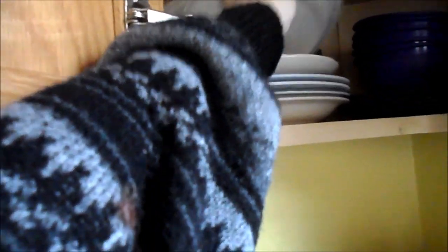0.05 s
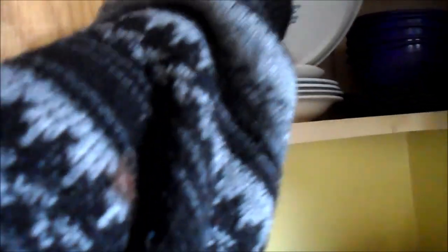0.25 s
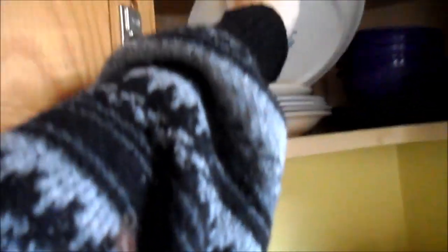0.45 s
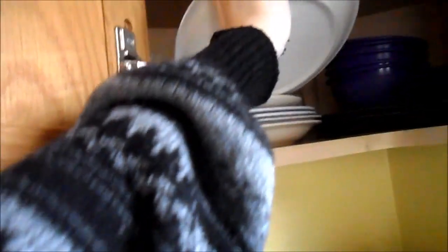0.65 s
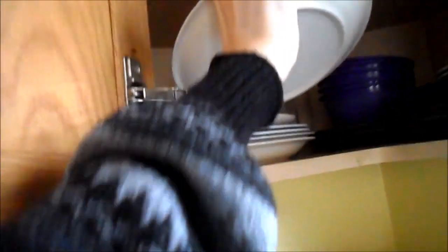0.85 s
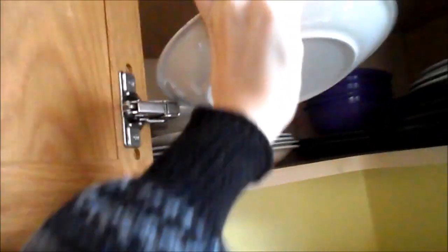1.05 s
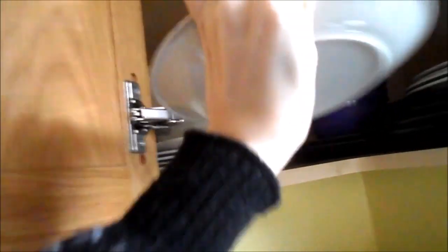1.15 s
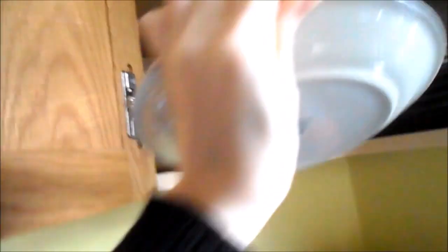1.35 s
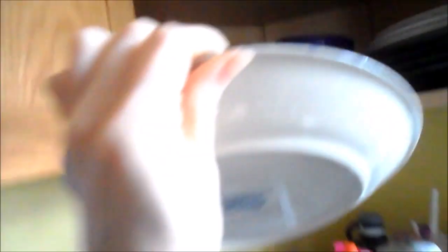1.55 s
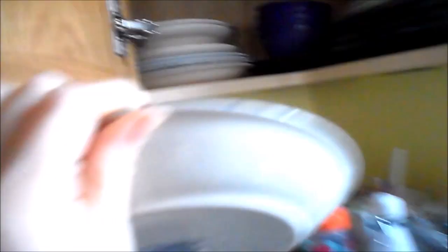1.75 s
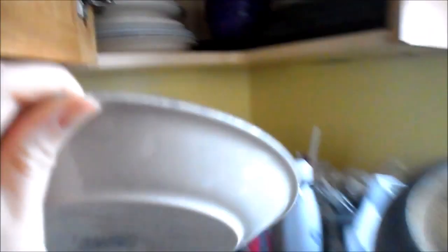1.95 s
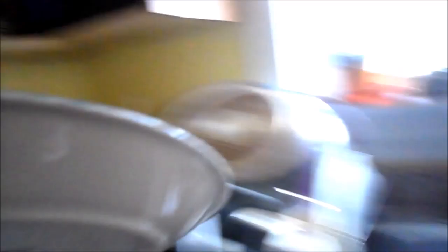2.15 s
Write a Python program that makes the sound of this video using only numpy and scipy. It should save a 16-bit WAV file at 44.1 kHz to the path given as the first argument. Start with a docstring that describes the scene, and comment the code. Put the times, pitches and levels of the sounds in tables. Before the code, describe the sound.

Ceramic plates clatter and ring as one is tipped up from a stack. It bumps and scrapes over the others, then knocks the wooden cupboard edge. A phone microphone at arm's length picks up faint kitchen hum.

```python
"""Ceramic plates in a wooden kitchen cupboard, a phone microphone at arm's length, over the room's hum.
The stack clatters as one plate is tipped up; each blow is a burst of chattering contacts that rings
the plates and echoes in the cupboard. The plate bumps and slides over the others, then knocks the
cupboard edge on its way out, which stills it. Last, a sleeve swishes softly three times."""
import sys
import numpy as np
from scipy import signal
from scipy.fft import rfft, irfft
from scipy.io import wavfile
from scipy.ndimage import uniform_filter1d

SR = 44100
rng = np.random.default_rng(int(sys.argv[2]) if len(sys.argv) > 2 else 0)


def dump_mix(stems):
    """Bounce the given channels to the path in sys.argv[1] as a 16-bit WAV at rate SR."""
    frames = np.atleast_2d(stems).T  # one column per channel
    limited = np.clip(frames, -1, 1)  # hard clip at full scale
    pcm = np.round(limited * 32767).astype(np.int16)
    wavfile.write(sys.argv[1], SR, pcm)


N = 97020
T = np.arange(N) / SR
BIN_HZ = np.arange(N // 2 + 1) * SR / N


def undb(db):
    return 10 ** (np.asarray(db) / 20)


def unit_rms(x):
    return x / np.sqrt(np.mean(x ** 2))


def excite(x, response):
    """Pass x through an impulse response scaled to unit energy."""
    return signal.fftconvolve(x, response / np.sqrt(np.sum(response ** 2)))[:N]


def on_log(table, hz):
    """Read rows of frequency_hz, value on a log frequency axis."""
    table = np.array(table)
    return np.interp(np.log(np.maximum(hz, 1)), np.log(table[:, 0]), table[:, 1])


def colour(x, spectrum):
    """Minimum-phase filter shaped by rows of frequency_hz, gain_db, scaled to a mean power gain of 1."""
    size = 4096
    gain = unit_rms(undb(on_log(spectrum, np.arange(size // 2 + 1) * SR / size)))
    cepstrum = irfft(np.log(gain))
    cepstrum[1:size // 2] *= 2
    cepstrum[size // 2 + 1:] = 0
    return signal.fftconvolve(x, irfft(np.exp(rfft(cepstrum))))[:N]


def wander(rate_hz):
    """Smooth random drift of unit RMS."""
    width = int(SR / rate_hz)
    return unit_rms(uniform_filter1d(uniform_filter1d(rng.standard_normal(N), width), width))


def room_hum(level_db=-55.5, flicker_db=2):
    """Room rumble and microphone hiss; each octave flickers on its own."""
    # noise floor: frequency_hz, gain_db
    floor = [(12, -19.5), (20, 1), (60, 2), (101, -12), (399, -15.5), (1810, -36), (1960, -27),
             (2140, -34.5), (2320, -34), (16000, -41)]
    spectrum = rfft(rng.standard_normal(N)) * undb(on_log(floor, BIN_HZ))
    out = 0
    for low_hz in 15 * 2 ** np.arange(11.):
        octave = irfft(spectrum * ((BIN_HZ >= low_hz) & (BIN_HZ < 2 * low_hz)), N)
        out += octave * undb(flicker_db * wander(rate_hz=6.6))
    return unit_rms(out) * undb(level_db)


def sleeve_swishes():
    """Soft swells of hiss as the cloth of a sleeve moves."""
    # sleeve movements: middle_s, half_width_s, level_db, centre_hz
    swishes = [(1.5, 0.057, -58.5, 4710), (1.79, 0.073, -59.5, 4740), (2.18, 0.067, -60.5, 5000)]
    # hiss of a swish centred on 4800 Hz: frequency_hz, gain_db
    cloth_spectrum = [(880, -24), (1500, -8), (2280, -11), (2790, -2.5), (3740, -3.5), (5380, -1),
                      (7160, -11), (10000, -18.5), (13000, -44), (22000, -120)]
    out = 0
    for middle_s, half_width_s, level_db, centre_hz in swishes:
        shifted = [(hz * centre_hz / 4800, db) for hz, db in cloth_spectrum]
        shifted = [(shifted[0][0] / 2, -50)] + shifted + [(1.5 * shifted[-1][0], -50)]
        hiss = colour(rng.standard_normal(N), shifted)
        swell = np.exp(-.5 * ((T - middle_s) / half_width_s * 0.97) ** 2)
        out += hiss * undb(level_db + wander(rate_hz=25)) * swell
    return out


def cupboard_echoes(direct, level_db=-13, build_s=0.005):
    """Dense reflections from cupboard and kitchen, each octave dying at its own rate."""
    # reverberation times: frequency_hz, t60_s
    decay_times = [(150, 0.13), (600, 0.33), (2000, 0.37), (6000, 0.14), (12000, 0.37)]
    t, tail = T[:SR // 2], 0
    for low_hz in 125 * 2 ** np.arange(7.):
        octave = signal.butter(2, [low_hz, 2 * low_hz], "band", fs=SR, output="sos")
        band = signal.sosfilt(octave, rng.standard_normal(len(t)))
        t60_s = on_log(decay_times, np.sqrt(2) * low_hz)
        tail += band * undb(-60 * t / t60_s) * (1 - np.exp(-t / build_s))
    return undb(level_db) * excite(direct, tail)


def chatter(scatter_db=4):
    """Dense, uneven contacts of glaze on glaze."""
    return unit_rms(rng.standard_normal(N) * undb(scatter_db * np.clip(rng.standard_normal(N), -2, 2)))


def blow_forces(blows):
    """Hard first contacts, then dying chatter. Two forces: one for the clatter, one for the ring."""
    strike_db = [6.5, 17.5]  # clatter, ring: the ring gets a cleaner strike
    spread_oct = np.array([[0.97], [0.38]])  # and a narrower push around the blow's pitch
    bass_hz, treble_hz = 482.7, 5555
    bass_lift_db, treble_lift_db, mid_floor_db, trim_db = 8.5, 10, -14.5, -10
    hz = BIN_HZ + 1
    bass = 1 / (1 + (hz / bass_hz) ** 4)
    treble = 1 / (1 + (treble_hz / hz) ** 4)
    mid = 1 - bass - treble
    contacts, spectra = chatter(), 0
    for start_s, level_db, pitch_hz, bass_db, treble_db, t60_s, ring_db in blows:
        decay = (T >= start_s) * undb(-60 * np.maximum(T - start_s, 0) / t60_s)
        bursts = np.tile(contacts * decay, (2, 1))
        bursts[:, int(start_s * SR)] = undb(strike_db)
        peak = undb(mid_floor_db) + np.exp(-.5 * (np.log2(hz / pitch_hz) / spread_oct) ** 2)
        tone = bass * undb(bass_db + bass_lift_db) + mid * peak
        tone += treble * undb(treble_db + treble_lift_db)
        spectra += rfft(bursts) * tone * undb(level_db + trim_db) * undb([[0], [ring_db]])
    return irfft(spectra, N)


def clatter(force, level_db=-2, t60_s=0.037, split_hz=1800):
    """Countless small, quickly damped treble modes: a noisy smear over the dull body of the blow."""
    # joint response of the small modes: frequency_hz, gain_db
    spectrum = [(47, -43.5), (80, -9), (200, -5.5), (441, -4), (672, -11), (958, -3.5), (1070, -9),
                (1740, -7), (2220, -13.5), (3240, -5.5), (5050, -12.5), (9000, -27), (16000, -38.5)]
    t = T[:SR // 10]
    smeared = excite(force, rng.standard_normal(len(t)) * undb(-60 * t / t60_s))
    low, high = (signal.butter(2, split_hz, kind, fs=SR, output="sos") for kind in ("low", "high"))
    return undb(level_db) * colour(signal.sosfilt(low, force) + signal.sosfilt(high, smeared), spectrum)


def ring(force, modes):
    """The force sets each mode ringing as a decaying sine."""
    t = T[:SR]
    response = sum(undb(db - 60 * t / t60_s) * np.sin(2 * np.pi * hz * t) for hz, db, t60_s in modes)
    return excite(force, response)


def plates(slide_ring_db=2.5, stilled_t60_s=0.037):
    """Blows and sliding ring whatever is touched; the knock on the cupboard edge stills the plate."""
    # blows within the stack, of the lifted plate and on the cupboard edge, levels relative:
    # start_s, level_db, pitch_hz, bass_db, treble_db, chatter_t60_s, ring_db
    stack_blows = [(0.112, -35.5, 1298, -15, -11, 0.33, -3), (0.168, -27, 1312, -10, -20.5, 0.066, -1),
                   (0.201, -14.5, 799, -11, -29, 0.17, 1.5), (0.208, -13, 854, -10.5, -24, 0.14, -1.5),
                   (0.209, -22.5, 3250, -20, -20, 0.09, 4), (0.237, -6.5, 5200, -11.5, -5.5, 0.07, 4.5),
                   (0.239, -4.5, 1769, -14, -11.5, 0.077, 1), (0.245, -9, 1687, -27, -14, 0.15, -2),
                   (0.255, -11.5, 3100, -20.5, -21.5, 0.12, 5), (0.265, -10.5, 898, -23.5, -26, 0.15, 0),
                   (0.293, -1.5, 1400, -28.5, -7.5, 0.13, -0.5),
                   (0.299, -4.5, 3814, -27.5, -15, 0.062, -4.5), (0.304, -11, 968, -31, -19, 0.097, 0.5),
                   (0.311, -5, 3290, -16.5, -18, 0.15, -3), (0.335, -2.5, 962.6, -19.5, -10, 0.07, 1),
                   (0.346, 1, 1382, -18, -9, 0.091, 1), (0.353, -8, 3764, -18.5, -24.5, 0.017, 1),
                   (0.361, -11.5, 1690, -20.5, -17.5, 0.1, 4), (0.389, -16, 1204, -30, -13, 0.3, 1),
                   (0.395, -1, 975, -26, -10.5, 0.037, 8), (0.405, -3.5, 2800, -29.5, -9.5, 0.076, 0.5),
                   (0.417, -25.5, 3700, -16.5, -25, 0.062, 5.5),
                   (0.432, -12.5, 1760, -12.5, -13.5, 0.086, -3), (0.441, -17, 2300, -5.5, -25.5, 0.092, 0)]
    plate_blows = [(0.655, -17.5, 920, -20, -35, 0.33, 12.5), (0.66, -12, 1020, -28, -13, 0.13, -8.5),
                   (0.667, -8.5, 1910, -28, -18.5, 0.056, 4), (0.674, -21.5, 1000, -9, -4, 0.13, -14),
                   (0.684, -25, 3500, -13, -21, 0.15, 9.5), (0.706, -26, 934, -20, -38, 0.054, -8),
                   (0.731, -13, 1200, -30, -18, 0.28, 1), (0.744, -17.5, 1180, -22, -17, 0.25, -8),
                   (0.762, -24, 1780, -18, -12, 0.067, 1), (0.79, -25.5, 990, -15, -31, 0.035, -7),
                   (0.816, -13.5, 4300, -13, -9.5, 0.027, 4), (0.83, -14, 960, -22, -30, 0.022, 12),
                   (0.838, -37.5, 3900, -5.5, -26, 0.02, 9), (0.853, -22, 1750, -17, -37, 0.11, -7),
                   (0.872, -27, 990, -38, -13.5, 0.21, 7), (0.888, -25, 2800, -10, -12, 0.045, -21),
                   (0.908, -21.5, 1570, -16, -30, 0.036, 7)]
    edge_blows = [(1.155, -10, 2520, -23, -11, 0.043, 3), (1.17, -16.5, 3700, -12.5, -8.5, 0.064, 1),
                  (1.185, -19, 2250, -10.5, -47, 0.066, -3), (1.251, -41, 4900, -11, -23, 0.1, 11.5),
                  (1.265, -32, 3800, -10, -14.5, 0.11, 3.5), (1.277, -35, 1400, -13.5, -36, 0.087, 2)]
    # the modes those blows ring: pitch_hz, relative_level_db, t60_s
    stack_modes = [(844.4, -8.5, 0.06), (993, -0.5, 0.046), (1160, -6.5, 0.25), (1360, 0, 0.05),
                   (1418, -6.5, 0.28), (1750, -9, .08), (1704, -3.5, 0.09), (1733, -13, 0.5),
                   (1766, -3.5, 0.38), (1685, -8.5, 0.095), (1960, -5, 0.17), (2328, -8, .17),
                   (2802, -2, 0.18), (3018, -1.5, 0.3), (3293, 3, 0.17), (3610, -8.5, 0.25),
                   (3706, -0.5, 0.07), (4900, -4.5, .09), (5200, -4, 0.086), (4970, 2.5, 0.06),
                   (5540, -9.5, 0.12), (6492, -16.5, .19), (7461, -17, 0.12), (8860, -16, .12),
                   (9030, -12.5, 0.09), (9820, -11, 0.14)]
    plate_modes = [(452, 0, 0.068), (720, -13, 0.56), (990, -29, 0.027), (987, -0.5, 0.17),
                   (1180, -10.5, 0.15), (1228, 6.5, 0.081), (1435, 9.5, 0.043), (1733.5, -2.5, 0.49),
                   (1820, 2.5, .1), (2017, 13.5, 0.043), (2068, -5.5, 0.13), (2580, -29, .2),
                   (2648, 9.5, 0.26), (2936, 7.5, 0.13), (3230, -32, .2), (3700, 8, 0.072),
                   (3880, 3.5, .18), (5350, 11.5, 0.067), (5440, 1, 0.07), (6140, -25.5, 0.061),
                   (6490, -15, 0.13), (6560, 9, 0.05), (8350, -1.5, 0.13), (9200, -15, 0.067),
                   (9520, -7, 0.09), (10650, -12, 0.08), (10400, -25, 0.16), (12470, -27, 0.15),
                   (12620, -12, .12), (13290, -23, .1)]
    edge_modes = [(252.8, -3, 0.63), (279.3, -10.5, 0.3), (602, -7.5, 0.42), (728, 9.5, 0.067),
                  (1354, -3, 0.15), (1480, 6, 0.017), (2415, -5.5, 0.26), (2460, 4.5, 0.026),
                  (2640, -12.5, 0.077), (3050, -36, 0.15), (3595, -4, 0.085), (3896, -12, 0.17),
                  (3984, 4.5, 0.11), (4106, -2.5, 0.12), (4915, -2.5, 0.15), (5260, -9, 0.06),
                  (6200, -33, 0.17), (6430, -4.5, 0.06), (8500, -17, 0.083), (8330, -10, 0.14),
                  (9250, -15, 0.11), (11050, -16, 0.087), (9800, -21, 0.078), (12560, -37, 0.13),
                  (13310, -25, 0.12)]
    # friction of plate sliding on plate: time_s, level_db
    slide_levels = [(0, -65), (.09, -57), (.15, -62.5), (.2, -53), (.45, -41.5), (.52, -50), (.64, -64),
                    (.85, -42), (.92, -66.5), (.96, -69.5), (1.2, -79), (1.27, -52), (1.33, -73),
                    (1.4, -110)]
    slide = chatter() * undb(np.interp(T, *np.array(slide_levels).T))
    bump_s, knock_s = plate_blows[0][0], edge_blows[0][0]
    stilled = undb(-60 * np.maximum(T - knock_s, 0) / stilled_t60_s)
    stages = [(stack_blows, stack_modes, undb(-5.5), T < bump_s),
              (plate_blows, plate_modes, undb(-5) * stilled, (T >= bump_s) & (T < knock_s)),
              (edge_blows, edge_modes, undb(3.5), T >= knock_s)]
    out = 0
    for blows, modes, ring_gain, touching in stages:
        clatter_force, ring_force = blow_forces(blows)
        friction = slide * touching
        out += clatter(clatter_force + friction)
        out += ring_gain * ring(ring_force + friction * undb(slide_ring_db), modes)
    return out


def scene():
    """Plates at arm's length with their echoes, the sleeve and the room, in mono."""
    direct = plates()
    return (direct + cupboard_echoes(direct) + sleeve_swishes() + room_hum())[None]


def record(dry, top_hz=16050):
    """The phone cuts the highest treble steeply."""
    return signal.sosfilt(signal.ellip(12, .2, 90, top_hz, fs=SR, output="sos"), dry)


dry = scene()
out = record(dry)
dump_mix(out)
```